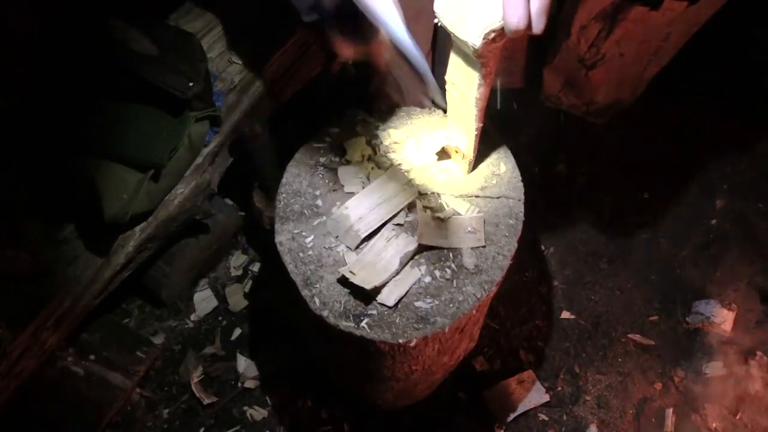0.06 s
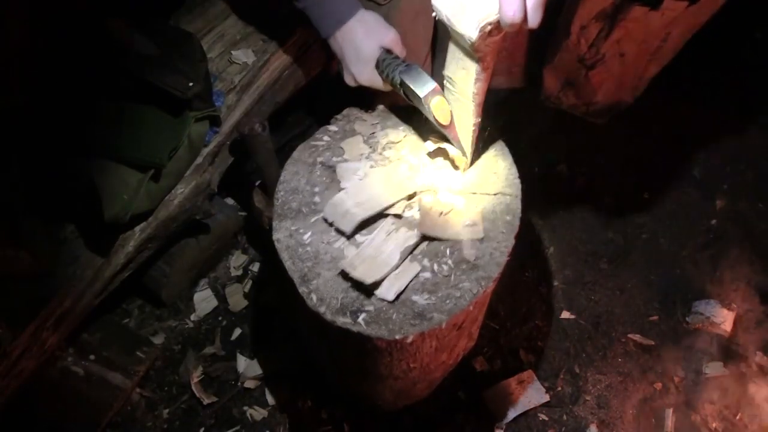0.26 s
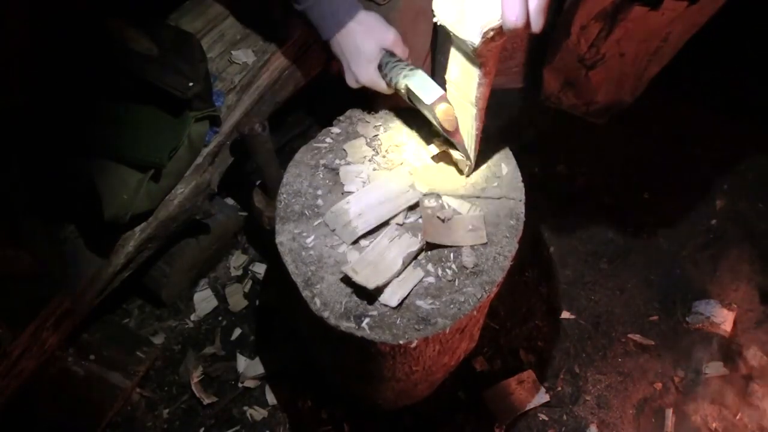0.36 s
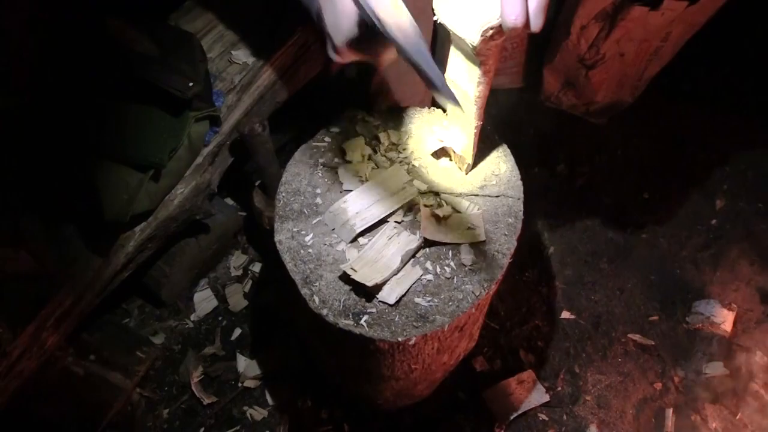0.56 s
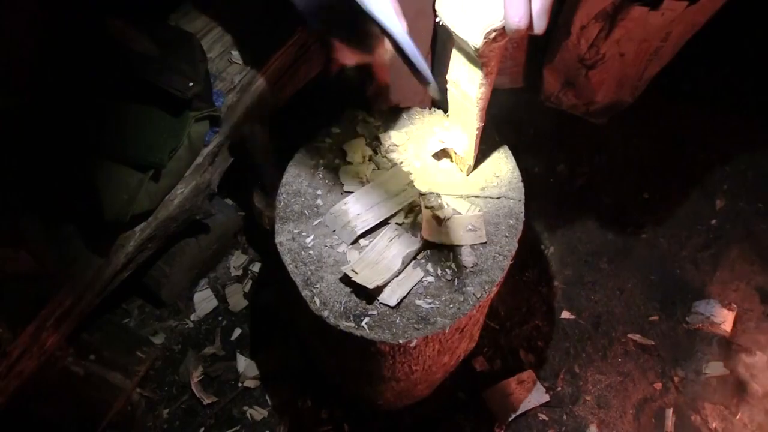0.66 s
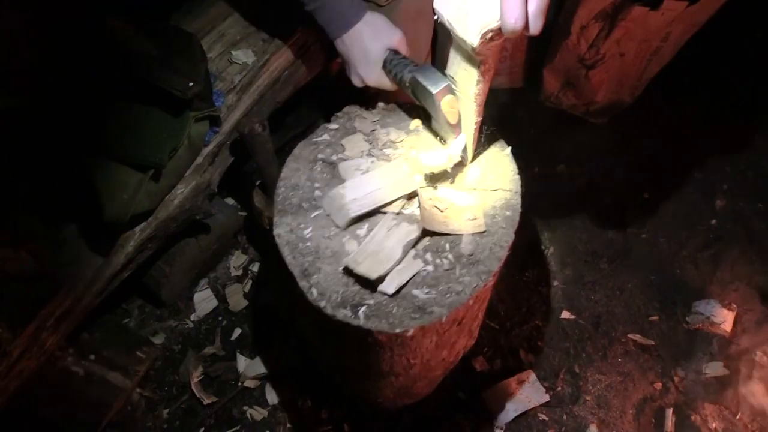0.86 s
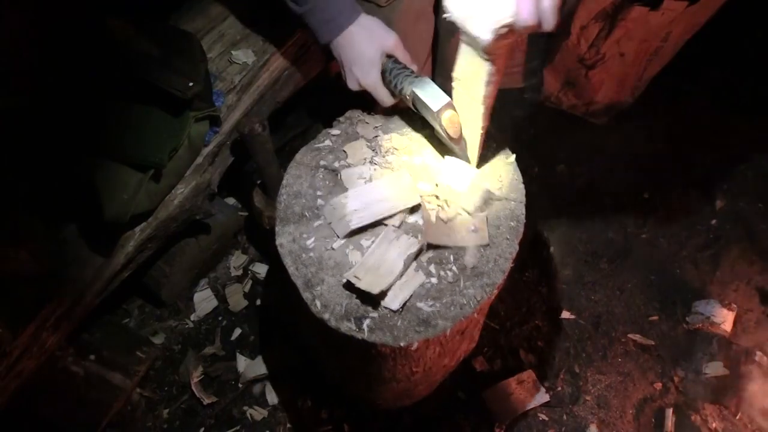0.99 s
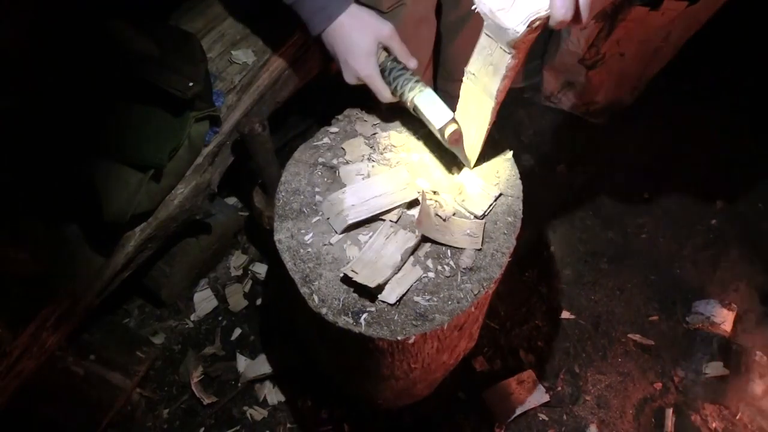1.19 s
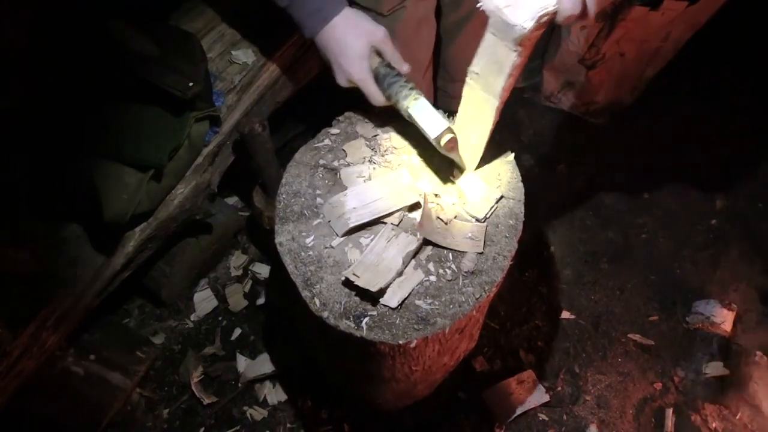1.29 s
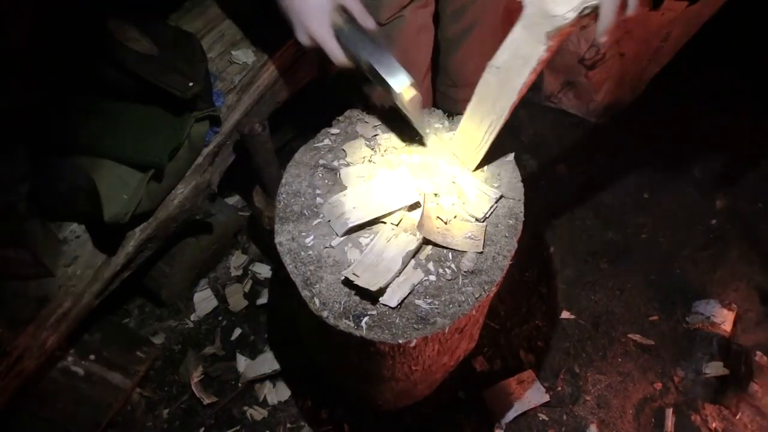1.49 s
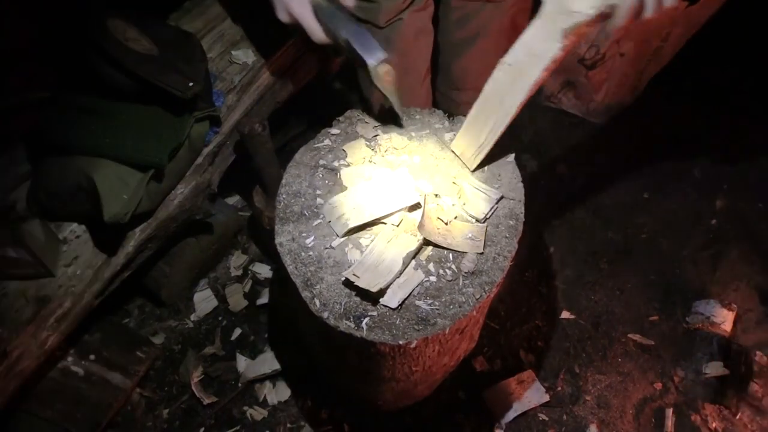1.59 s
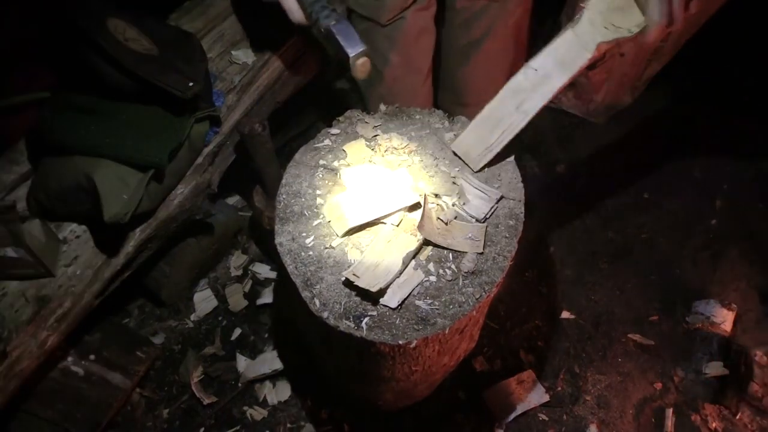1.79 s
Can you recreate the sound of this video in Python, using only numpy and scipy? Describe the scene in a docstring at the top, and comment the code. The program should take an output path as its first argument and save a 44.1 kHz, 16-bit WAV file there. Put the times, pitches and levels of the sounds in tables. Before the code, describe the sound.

A hatchet chops twice into a wooden blank on a block, with ticking splinters and rustling clothes

```python
"""A hatchet chops twice into a wooden blank on a chopping block, outdoors and close to the microphone.
Each blow is a cluster of contacts: damped modes of blank and block, a thud of a few cycles and torn-fibre noise.
The block also thumps on the ground, as slow low modes, and the peaks overload the recorder.
Around the blows splinters tick as short noise bands and clothes rustle as grainy noise,
most of all when the blank is lifted at the end."""
import sys
import numpy as np
from scipy import signal
from scipy.fft import rfft, irfft, next_fast_len
from scipy.io import wavfile
from scipy.ndimage import map_coordinates

SR = 44100
rng = np.random.default_rng(int(sys.argv[2]) if len(sys.argv) > 2 else 0)


def waveform_to_disk(signal):
    """Save audio, clipped to [-1, 1], as 16-bit WAV at the path in sys.argv[1]."""
    frames = np.transpose(np.atleast_2d(signal))
    scaled = np.clip(frames, -1, 1) * 32767
    samples = np.round(scaled).astype(np.int16)
    wavfile.write(sys.argv[1], SR, samples)


N = 81585

# Sleeves and ambient air, before fixed trims:
# (time [s], cloth level [dB], low-mid level [dB], rumble level [dB])
FLOOR = [(0.0, -61.5, -64, -60.5), (0.108, -56.5, -57.5, -58.5), (0.246, -64, -68.5, -61.5),
         (0.452, -61, -66, -63.5), (0.628, -63, -61, -54.5), (0.73, -55.5, -57, -59.5),
         (0.86, -66.5, -63.5, -55), (1.004, -70.5, -74, -70), (1.158, -64.5, -68.5, -69.5),
         (1.344, -59.5, -65, -62.5), (1.442, -59.5, -60.5, -55), (1.566, -53.5, -55, -54.5),
         (1.72, -55.5, -57, -56.5), (1.85, -52, -56.5, -52)]
# Relative spectra of cloth, low-mid air and rumble: (frequency [Hz], level [dB])
CLOTH_SPECTRUM = [(1200, -1.5), (1560, -1.5), (2450, 1), (3950, -2), (5020, -4.5), (6700, -11.5),
                  (8000, -18), (10000, -16.5), (12000, -28.5), (16000, -39.5)]
MIDS_SPECTRUM = [(60, -10.5), (170, 4.5), (350, 5), (700, 0), (1150, 1.5), (1700, -7.5), (3000, -26)]
RUMBLE_SPECTRUM = [(15, -1), (35, 0), (80, 0), (150, -3.5), (300, -24), (800, -63)]
# Shuffles as the blank is lifted:
# (time [s], level [dB], centre [Hz], width [octaves], rise constant [s], fall constant [s])
SHUFFLES = [(1.544, -41.5, 148, 1.21, 0.0034, 0.017), (1.628, -42, 930, 1.27, 0.032, 0.021),
            (1.685, -49, 3400, 0.81, 0.06, 0.033), (1.835, -59, 120, 1.46, 0.017, .03)]
# Decay of the yard's answer: (frequency [Hz], t60 [s])
YARD_DECAY = [(100, 0.13), (400, .05), (2000, 0.082), (10000, 0.032)]
# Block pushed into the ground, then settling:
# (time [s], level [dB], delay of settling knock [s], knock level [dB])
THUMPS = [(0.204, -31.5, .036, -38.5), (0.831, -36, .031, -43.5)]
# Modes of the block on the soil and of its settling knock: (frequency [Hz], level [dB], t60 [s])
GROUND_MODES = [(42, 0, 0.15), (53, -10.5, 0.5), (77.9, -8, 0.61)]
SETTLE_MODES = [(131, -12, .05), (212, -2, .07), (343.5, -3, .05), (470, -6.5, 0.051)]
# Splinters ticking and wood scraping: (time [s], level [dB], centre [Hz], width [octaves], t60 [s])
TICKS = [(0.0984, -41, 1540, 0.14, .045), (0.1236, -47.5, 2600, 0.64, 0.092),
         (0.1476, -42, 2840, 0.61, 0.02), (0.2335, -48.5, 3530, 0.65, 0.037),
         (0.2676, -44, 3060, 0.2, 0.046), (0.425, -45.5, 3000, 0.36, 0.042),
         (0.7286, -47, 2980, 0.36, 0.016), (0.7527, -46, 2960, 0.56, .02), (0.7652, -46, 2580, 0.62, 0.029),
         (0.7972, -46.5, 2380, 0.78, 0.16), (0.815, -44, 3840, 0.79, 0.048),
         (0.863, -53.5, 3380, 0.64, 0.034), (0.912, -59.5, 3285, 0.36, 0.026),
         (0.9516, -59.5, 3400, 0.35, .02), (0.9696, -53, 4100, .5, .015), (1.0865, -50, 2870, 0.82, 0.012),
         (1.0975, -50, 3364, 0.48, 0.029), (1.1397, -51.5, 2200, 0.46, .015),
         (1.1795, -30.5, 2440, 0.33, .012), (1.224, -38, 2230, 0.32, 0.012),
         (1.2513, -40.5, 2400, 0.27, 0.012), (1.296, -46, 2100, 0.43, .012),
         (1.3492, -32, 5130, 0.16, 0.011), (1.367, -49, 2560, .25, 0.027),
         (1.6815, -32.5, 3440, 0.53, .014)]
# Relative spectrum of the broadband snap in a tick: (frequency [Hz], level [dB])
SPLINTER_SPECTRUM = [(300, -25), (1200, -10), (2200, -0.5), (5000, 0.5), (8000, -11.5), (11000, -15.5),
                     (15000, -29)]
# Contacts within the blows: (time [s], blank level [dB], block level [dB], ringing length [0-1],
# thud level [dB], thud frequency [Hz], crack level [dB], crack t60 [s], crack tilt [dB/octave])
CONTACTS = [(0.2007, -8.5, -12.5, 0.89, -10, 530, -8.5, .033, -2),
            (0.2057, -16, -13, 0.92, -5.5, 1110, -9, 0.019, 0.5),
            (0.2115, -16, -25, 0.52, -27, 316, -23.5, 0.023, -0.5),
            (0.8232, -8.5, -17.5, 0.39, -1, 1880, 0.5, 0.0083, -1.5),
            (0.8250, -17.5, -24.5, 0.5, -6.5, 3260, -15, 0.0063, -1),
            (0.8304, -16.5, -18, .7, -13.5, 773, -16.5, 0.017, -4),
            (0.8333, -19.5, -22.5, .7, -16, 319, -20, 0.014, 3.5),
            (0.8377, -32, -17.5, .7, -11, 906, -30.5, 0.047, -5.5)]
# Modes of blank and block, t60 at full ringing length:
# (frequency [Hz], level in first blow [dB], level in second blow [dB], t60 [s])
BLANK_MODES = [(986, -8.5, -10.5, 0.031), (1139, -5, -11.5, .023), (1310, -8, -4, 0.021),
               (1727, -10, -14.5, 0.019), (1990, -18, -7.5, 0.012), (2450, -19.5, -6.5, .025),
               (2585, -10.5, -4, .028), (3056, -13, -12, 0.012), (3357, -12, -4.5, 0.022),
               (3760, -9.5, -7.5, 0.029), (4234, -8.5, -2, 0.017), (4935, -7, -21, .022)]
BLOCK_MODES = [(167.5, -17.5, -11, 0.1), (235, -24, -24, 0.1), (370, -8.5, -10, .055),
               (453, -5, -5.5, .045), (600, -10, -7, .035), (674, -5, -11.5, 0.04), (774, -5.5, -12, 0.034),
               (936, -9.5, 0.5, 0.058)]
# Relative spectrum of tearing fibres before tilt: (frequency [Hz], level [dB])
CRACK_SPECTRUM = [(100, -19), (400, -12.5), (1200, 0.5), (2400, -1), (4700, -2.5), (6000, -12.5),
                  (8500, -17), (11000, -24.5), (15500, -27)]
# Response of the microphone: (frequency [Hz], gain [dB])
MICROPHONE = [(15, -4), (50, -0.5), (8000, 0), (11000, -4.5), (15000, -4.5), (16500, -10.5)]

TEAR_GRAINS_PER_S, MODE_SCATTER_DB = 2490, 2.24
TICK_SNAP_DB = -18.5  # broadband snap under the woody pitch
THUD_CYCLES = 1  # a thud peaks after this many cycles, then dies
YARD_DB = -26  # relative to the wood
CLIP_TOP, TOP_HZ = 0.46, 16000  # ceiling of the waveform, band limit


def amp(db):
    """Decibels are a logarithmic ratio; return the linear gain."""
    return 10 ** (np.asarray(db) / 20)


def unit(x):
    """Normalisation to an rms of 1."""
    return x / np.sqrt(np.mean(x ** 2) + 1e-20)


def clock():
    """Sampling: the time in seconds of each sample."""
    return np.arange(N) / SR


def along(points, hz):
    """Interpolation of (frequency, value) points on a log-frequency axis."""
    f, v = np.transpose(points)
    return np.interp(np.log(hz + 1), np.log(f + 1), v)


def hump(hz, centre_hz, octaves):
    """A Gaussian band on a log-frequency axis."""
    return np.exp(-.5 * (np.log2((hz + 1) / centre_hz) / octaves) ** 2)


def filtered(x, response):
    """Linear filtering: multiply the spectrum of x by a response of frequency."""
    m = next_fast_len(len(x) + SR // 10)
    return irfft(rfft(x, m) * response(np.fft.rfftfreq(m, 1 / SR)), m)[:len(x)]


def noise(spectrum):
    """Spectral shaping of white noise, normalised to rms 1."""
    white = rng.standard_normal(N)
    return unit(filtered(white, lambda hz: amp(along(spectrum, hz))))


def wobble(rate, size=N):
    """Spline interpolation of random knots, rate of them a second."""
    knots = rng.standard_normal(size // 4)
    return map_coordinates(knots, [np.arange(size) * rate / SR], mode="mirror")


def grains(spectrum, rate, spread_db, size):
    """Random amplitude modulation clumps noise into grains before spectral shaping."""
    clumps = rng.standard_normal(size) * amp(spread_db * wobble(rate, size))
    return unit(filtered(clumps, lambda hz: amp(along(spectrum, hz))))


def add(out, s, x):
    """Superposition: mix x into out from second s."""
    i = round(s * SR)
    out[i:i + len(x)] += x[:N - i]


def ring(modes, attack_s, length=1, size=SR // 8):
    """Modal synthesis: damped sines, struck a little differently each time; a pressing blade shortens them."""
    t = np.arange(size) / SR
    tones = np.zeros(size)
    for k, (hz, db, t60) in enumerate(modes):
        struck_db = db + MODE_SCATTER_DB * rng.standard_normal()
        decay = amp(struck_db - 60 * t / (t60 * length))
        tones += (-1) ** k * decay * np.sin(2 * np.pi * hz * t)  # neighbouring modes alternate in sign
    return tones * (1 - np.exp(-t / attack_s))


def rustle():
    """Friction noise: grainy cloth over soft air and rumble; the background dips after each blow and slowly
    recovers."""
    s, *columns = np.transpose(FLOOR)
    cloth_db, mids_db, rumble_db = [np.interp(clock(), s, column) for column in columns]
    cloth = grains([(500, -36.5)] + list(CLOTH_SPECTRUM), rate=500, spread_db=2.0, size=N)
    cloth_gain = amp(cloth_db - 0.5 + .8 * wobble(40))
    mids = amp(mids_db + 1.7) * noise(MIDS_SPECTRUM)
    rumble = amp(rumble_db + 0.5) * noise(RUMBLE_SPECTRUM)
    return cloth_gain * cloth + mids + rumble


def shuffles():
    """Friction bursts: grainy noise bands of clothing with exponential rise and fall."""
    out, t = np.zeros(N), clock()
    for s, db, centre_hz, octaves, rise, fall in SHUFFLES:
        rubbing = rng.standard_normal(N) * amp(2.65 * wobble(300))
        band = unit(filtered(rubbing, lambda hz: hump(hz, centre_hz, octaves)))
        envelope = np.exp(-np.maximum((s - t) / rise, (t - s) / fall))
        out += amp(db) * band * envelope
    return out


def yard(x):
    """Reverberation: convolution with decaying noise, a short answer from the ground and stacked wood."""
    hz, t, z = signal.stft(rng.standard_normal(SR // 2), SR, nperseg=256)
    decay = amp(-60 * t / along(YARD_DECAY, hz)[:, None])
    tail = signal.istft(z * decay, SR, nperseg=256)[1]
    delayed = np.pad(tail, (SR // 200, 0))  # 5 ms
    return signal.fftconvolve(x, delayed / np.linalg.norm(tail))[:N]


def ground():
    """Low-frequency resonance: the heavy block rocks on the soil, then settles with a faint knock."""
    out = np.zeros(N)
    for s, db, delay, settle_db in THUMPS:
        add(out, s, amp(db) * ring(GROUND_MODES, attack_s=0.005, size=SR // 2))
        add(out, s + delay, amp(settle_db) * ring(SETTLE_MODES, attack_s=.001))
    return out


def splinters():
    """Band-limited impulsive noise: small snaps, each with a brief woody pitch."""
    out, t = np.zeros(N), clock()[:SR // 10]
    for s, db, centre_hz, octaves, t60 in TICKS:
        colour = lambda hz: hump(hz, centre_hz, octaves) + amp(TICK_SNAP_DB + along(SPLINTER_SPECTRUM, hz))
        snap = unit(filtered(rng.standard_normal(len(t)), colour))
        add(out, s, amp(db - 60 * t / t60) * (1 - np.exp(-t / 0.00035)) * snap)
    return out


def thud(hz, t):
    """Heavily damped oscillation: wood gives way under the blade in a few cycles that swell and die."""
    u = hz * t / THUD_CYCLES
    return (u * np.exp(1 - u)) ** 2 * np.sin(2 * np.pi * hz * t)


def tearing(tilt, size):
    """Stochastic fracture: grainy noise of torn fibres, its spectrum tilted in dB per octave."""
    tilted = [(hz, db + tilt * np.log2(hz)) for hz, db in CRACK_SPECTRUM]
    return grains(tilted, TEAR_GRAINS_PER_S, spread_db=0.5, size=size)


def chops():
    """Impact excitation: contacts thud, tear fibres and ring wood; the mode mix depends on where the blow lands."""
    out, t = np.zeros(N), clock()[:SR // 10]
    for s, blank_db, block_db, length, thud_db, thud_hz, crack_db, t60, tilt in CONTACTS:
        blow = np.argmin([abs(s - thump[0]) for thump in THUMPS])  # the nearest thump tells which blow
        blank = [(hz, levels[blow], decay) for hz, *levels, decay in BLANK_MODES]
        block = [(hz, levels[blow], decay) for hz, *levels, decay in BLOCK_MODES]
        add(out, s, amp(blank_db) * ring(blank, attack_s=0.00011, length=length))
        add(out, s, amp(block_db) * ring(block, attack_s=.0006, length=length))
        add(out, s, amp(thud_db) * thud(thud_hz, t))
        crack_envelope = amp(crack_db - 60 * t / t60) * (1 - np.exp(-t / .00015))
        add(out, s, crack_envelope * tearing(tilt, len(t)))
    return out


def scene():
    """Superposition of all sources at the microphone."""
    wood = chops() + splinters()
    answer = amp(YARD_DB) * yard(wood)
    return (wood + answer + ground() + rustle() + shuffles())[None]


def record(dry):
    """Saturation and band limiting: the recorder flattens peaks, softens the treble and cuts steeply above."""
    clipped = dry[0] / (1 + np.abs(dry[0] / CLIP_TOP) ** 6) ** (1 / 6)
    coloured = filtered(clipped, lambda hz: amp(along(MICROPHONE, hz)))
    return filtered(coloured, lambda hz: 1 / np.sqrt(1 + (hz / TOP_HZ) ** 200))[None]


dry = scene()
out = record(dry)
waveform_to_disk(out)
```